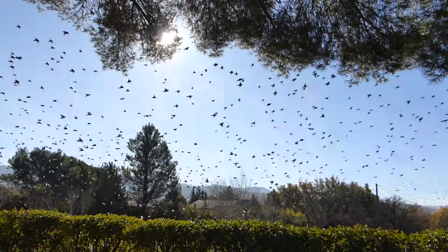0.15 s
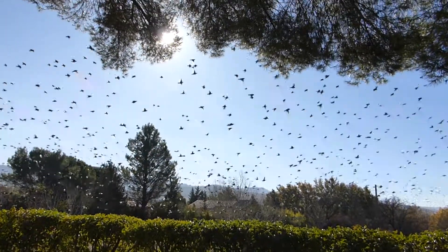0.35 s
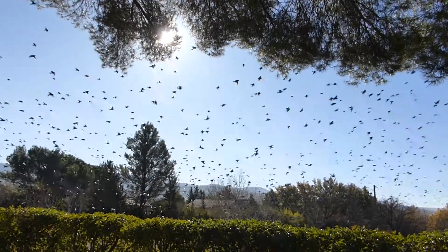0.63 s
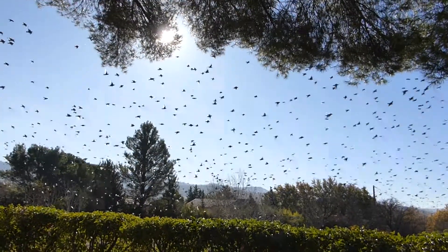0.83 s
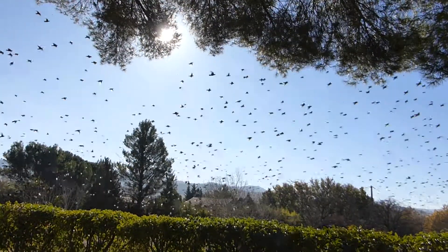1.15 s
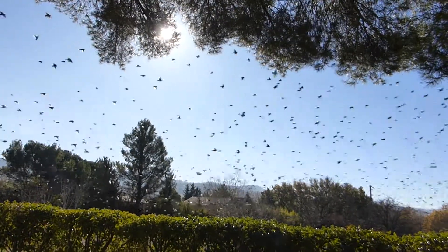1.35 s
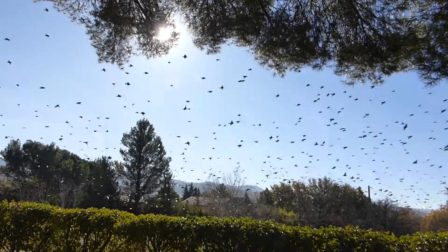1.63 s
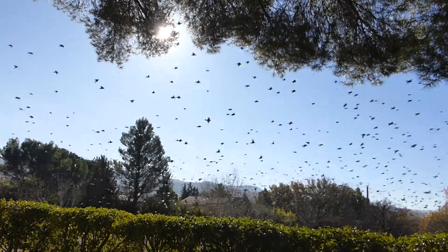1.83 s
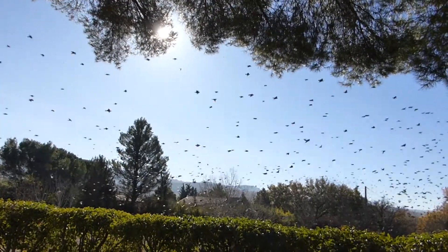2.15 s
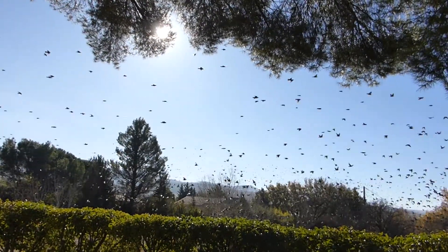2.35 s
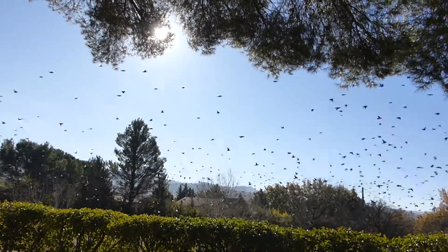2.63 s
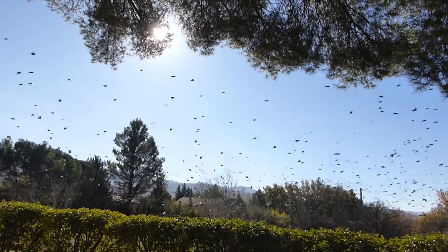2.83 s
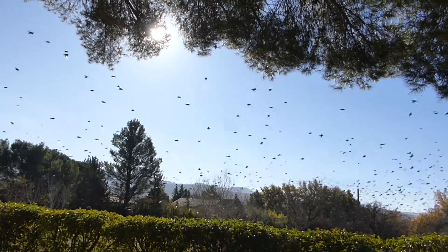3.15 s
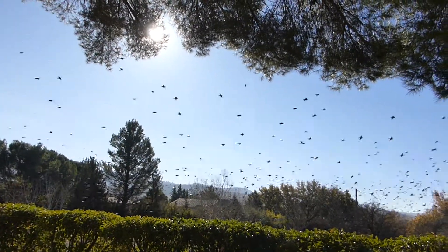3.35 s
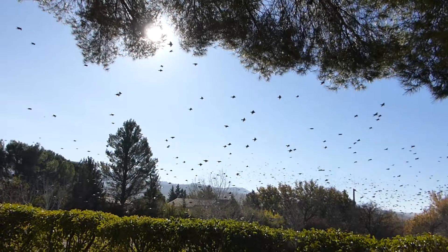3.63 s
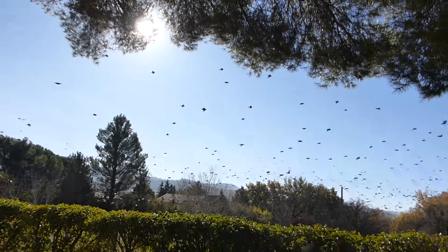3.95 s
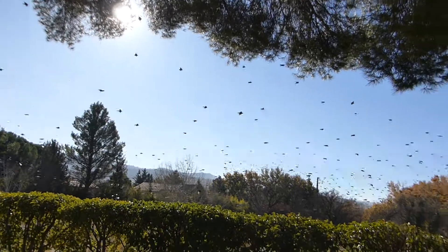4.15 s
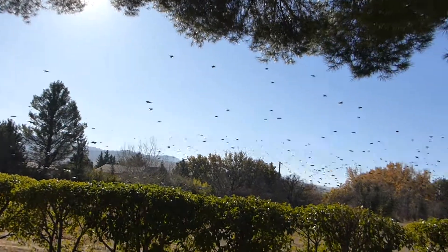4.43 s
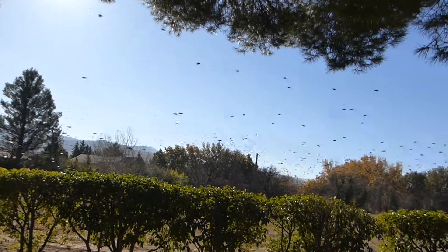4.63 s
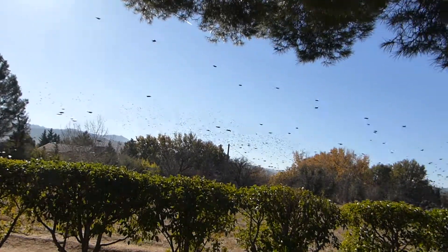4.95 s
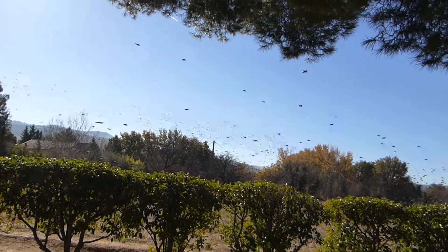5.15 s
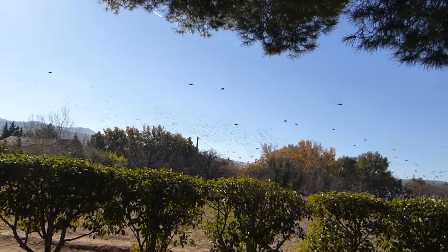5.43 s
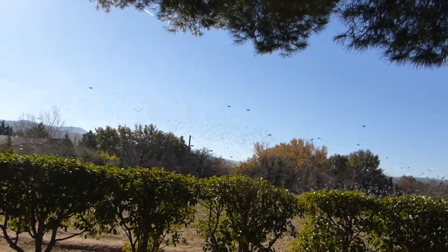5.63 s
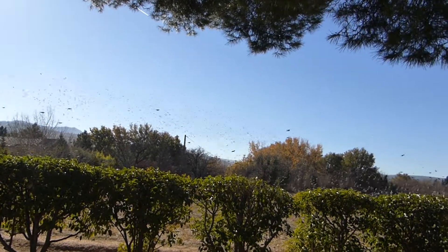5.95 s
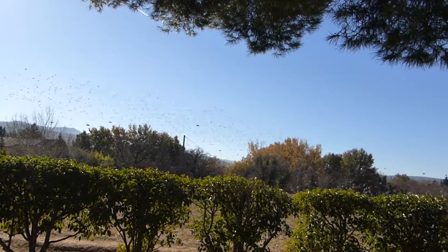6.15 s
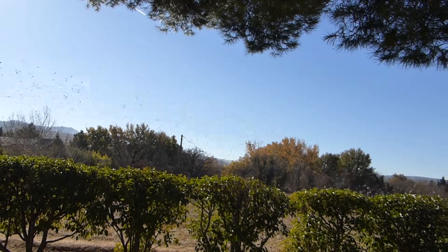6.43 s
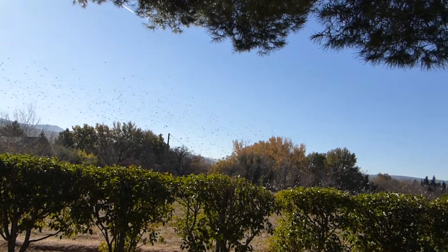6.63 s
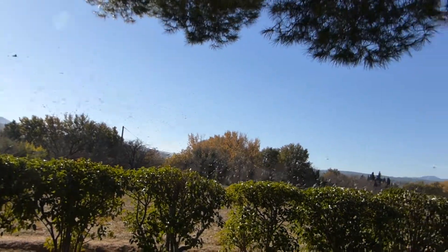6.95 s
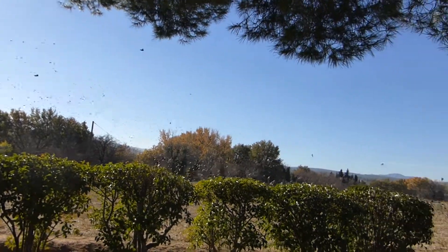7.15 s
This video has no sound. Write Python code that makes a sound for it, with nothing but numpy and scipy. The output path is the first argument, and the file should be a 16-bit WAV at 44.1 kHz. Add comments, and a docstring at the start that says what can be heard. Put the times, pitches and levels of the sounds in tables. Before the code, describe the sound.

Continuous dense twittering of countless starlings outdoors, blurred by distance and scattered tree echoes. Close birds add quick gliding whistles, rapid chirping rattles and tiny ticks, spread slightly left and right. Around four seconds rattles cluster and the crowd thickens; later a long thin whistle falls, and two soft wing puffs pass close just before the end. Quiet wing rush and distant valley wash sit underneath in a small stereo microphone.

```python
"""Starling flock over a garden

Near birds whistle, rattle and click: trembling sines, trains of chirps and decaying ticks.
Behind them, thousands of small calls make the babble of far birds, with echoes from trees and ground.
Shaped noise makes the rush of wings, close wing puffs, low hum and far wash.
A small microphone pair colours it all.
"""
import sys
import numpy as np
from scipy import signal
from scipy.fft import rfft, irfft, next_fast_len
from scipy.io import wavfile
from scipy.ndimage import uniform_filter1d

SR = 44100
rng = np.random.default_rng(int(sys.argv[2]) if len(sys.argv) > 2 else 0)


def int16_out(signal):
    """Quantize to a 16-bit WAV file."""
    q = np.round(np.clip(np.atleast_2d(signal).T, -1, 1) * 32767)
    wavfile.write(sys.argv[1], SR, q.astype(np.int16))


N = 321930


def gain_of(db):
    """Amplitude factor of a level in dB."""
    return 10 ** (np.asarray(db) / 20)


def evened(x):
    """Scales x to rms 1."""
    return x / np.sqrt(np.mean(x ** 2) + 1e-20)


def faded(x, fade_s):
    """Soft start and end."""
    return x * signal.windows.tukey(len(x), min(2 * fade_s * SR / len(x), 1))


def read(points, hz):
    """Reads a curve of (Hz, value) points, linear over log frequency."""
    point_hz, value = np.transpose(points)
    return np.interp(np.log(hz + 1), np.log(point_hz + 1), value)


def coloured(x, gain):
    """Multiplies the spectrum by gain(hz)."""
    size = next_fast_len(N)
    spectrum = rfft(x, size) * gain(np.fft.rfftfreq(size, 1 / SR))
    return irfft(spectrum, size)[..., :N]


def add(mix, start_s, sound, pan_db):
    """Adds a mono sound in place; pan_db is left minus right."""
    part = mix[:, max(round(start_s * SR), 0):][:, :len(sound)]
    part += gain_of([[pan_db / 2], [-pan_db / 2]]) * sound[:part.shape[1]]


def drift(length, span):
    """Smooth random curve of rms about 1 that changes over span samples."""
    smooth = uniform_filter1d(rng.standard_normal(length + 200), span)
    return evened(uniform_filter1d(smooth, span))[:length]


ROUND_TOP = 1.08  # exponent; above 1 the level lingers near its peak


def shape(length_s, first_hz, last_hz, bend_hz, peak_db, place, rise_db, fall_db):
    """Pitch glides from first to last with a bend; level swells to the peak and fades."""
    u = np.linspace(0, 1, int(length_s * SR))
    hz = first_hz + (last_hz - first_hz) * u + bend_hz * (1 - (2 * u - 1) ** 2)
    slope_db = np.where(u < place, rise_db, fall_db)
    return hz, gain_of(peak_db - slope_db * abs(u - place) ** ROUND_TOP)


def whistle(hz, waver, flutter_db, octave_db):
    """A near sine whose pitch and level tremble."""
    wavering_hz = hz * (1 + waver * drift(len(hz), span=60))
    turns = np.cumsum(wavering_hz) / SR
    tone = np.sin(2 * np.pi * turns) + gain_of(octave_db) * np.sin(4 * np.pi * turns)
    flutter = gain_of(flutter_db * drift(len(hz), span=150))
    return faded(evened(tone * flutter), 0.0018)


# One long falling whistle. Each row: time in seconds, pitch in Hz, level in dB.
LONG_CALL = [(6.124, 2880, -32), (6.135, 7500, -38), (6.147, 8090, -40), (6.2, 7880, -38.5),
             (6.3, 7720, -44.5), (6.42, 7080, -40), (6.44, 6530, -35), (6.47, 5330, -42)]
# Whistles of near birds. Each row: start in seconds, length in seconds, first pitch in Hz,
# last pitch in Hz, bend at mid-call in Hz, peak level in dB, place of the peak (0-1).
WHISTLE_CALLS = [ (0.0, 0.083, 3570, 3710, -80, -41, 0.64), (0.019, 0.033, 2100, 2068, 1, -37, 0.07),
                 (0.021, 0.026, 1036, 1040, 2, -41, 0.4), (0.152, 0.035, 2355, 2300, 0, -39.5, .4),
                 (0.227, 0.08, 4360, 4950, 60, -42.5, 0.2), (0.34, 0.05, 3700, 3880, 510, -31, 0.75),
                 (0.412, 0.07, 1790, 1660, 0, -42.5, 0.34), (0.498, 0.059, 3780, 3930, 660, -33, 0.87),
                 (.51, 0.048, 6050, 6300, 550, -43, .55), (0.507, 0.079, 3130, 2900, -58.5, -36, 0),
                 (0.605, 0.048, 2230, 2136, -2, -39, 0.2), (0.678, 0.11, 1832, 1677, -110, -44, 0.6),
                 (0.9, 0.13, 2570, 2440, 60, -45.5, 0.9), (1.069, 0.062, 3460, 4220, -18, -41, 0.75),
                 (1.48, 0.056, 3310, 3650, 682, -41, .7), (1.832, 0.16, 3160, 3030, -26.5, -41.5, 0.4),
                 (2.095, 0.027, 3090, 3800, -200, -37, .7), (2.103, 0.027, 1840, 2480, 50, -38.5, .6),
                 (2.114, 0.065, 4450, 5650, 480, -40, 0.3), (2.128, .014, 3050, 3350, 30, -37, .6),
                 (2.575, 0.08, 7460, 6400, 300, -42.5, 0.4), (2.805, 0.076, 2950, 3400, 0, -41, .4),
                 (2.808, .035, 6300, 6200, 12, -45.5, 0.7), (2.66, 0.018, 3620, 5160, 0, -35, 0.5),
                 (2.725, .035, 5520, 3800, 13, -43, 0.4), (2.882, 0.022, 2760, 3170, 0, -31, 0.93),
                 (2.908, 0.031, 7250, 6500, 350, -44.5, .7), (2.942, .04, 6800, 6550, 450, -47, .5),
                 (2.982, 0.049, 6700, 6500, 330, -45, .4), (3.005, 0.032, 3500, 4800, -300, -36.5, 0.9),
                 (3.258, 0.063, 3850, 3920, -50, -40, 0.2), (3.518, .02, 3790, 4450, 6, -32, 1),
                 (3.524, 0.027, 5450, 6270, 248, -38, 0.03), (3.75, 0.044, 2550, 2750, 0, -30.5, 0.2),
                 (3.784, 0.024, 2180, 2670, 0, -33.5, 0.5), (3.841, 0.031, 8050, 8130, 0, -40.5, 0.7),
                 (4.162, 0.03, 5900, 6100, 795, -46, 0.2), (4.199, 0.038, 5900, 4800, 57, -36.5, 0.6),
                 (4.455, 0.15, 6340, 5500, 558, -45.5, 0.5), (4.613, 0.029, 2540, 2860, 0, -38, .05),
                 (4.685, 0.105, 7600, 6000, 550, -43, 0.5), (4.713, 0.025, 2496, 3180, -120, -30.5, 0.55),
                 (5.036, 0.054, 2010, 1960, -6, -41, 0.6), (5.316, 0.074, 1650, 1305, -120, -44, 0.43),
                 (5.428, 0.1, 3270, 3010, -54, -29.5, 0.9), (5.429, 0.075, 8500, 7950, 100, -43, 0.3),
                 (5.697, 0.077, 1640, 1340, -16, -46, 0.6), (5.753, 0.0264, 5730, 6150, 55, -37.5, .6),
                 (5.818, 0.0088, 2370, 2100, 1, -35, .3), (6.075, 0.053, 7970, 8100, 0, -42, 0.8),
                 (6.488, 0.095, 5720, 4670, -45, -38, .05), (6.24, 0.042, 4230, 4440, -23, -34, .65),
                 (6.288, 0.088, 2116, 2180, 150, -40.5, 0.55), (6.55, 0.085, 1724, 1810, 46, -40.5, 0.6),
                 (6.6, 0.16, 7530, 7450, 200, -47, 0.8), (6.682, 0.039, 4180, 3644, 3, -32, 0.5),
                 (6.785, 0.022, 4650, 7800, 900, -31, 0.1), (6.79, 0.051, 2790, 3020, -4, -33, 0.3),
                 (7.03, 0.037, 3940, 3660, 0, -37, .05), (7.128, 0.047, 4500, 4336, 3, -33.5, 0.5)]
WHISTLE_RISE_DB, WHISTLE_FALL_DB = 12, 13.5  # level change over one call length around the peak
STEADY_WAVER = .008  # rms pitch tremble, share of pitch


def along(rows):
    """Start time in seconds and the other columns, sample by sample."""
    s, *columns = np.transpose(rows)
    t = np.arange(s[0], s[-1], 1 / SR)
    return [s[0]] + [np.interp(t, s, column) for column in columns]


def near_whistles():
    """Trembling near sines that glide and swell, each at a random pan."""
    mix = np.zeros((2, N))
    start_s, hz, db = along(LONG_CALL)
    rounded_hz = uniform_filter1d(hz, 100, mode="nearest")
    calls = [(start_s, rounded_hz, gain_of(db))]
    for start_s, *row in WHISTLE_CALLS:
        calls.append((start_s, *shape(*row, WHISTLE_RISE_DB, WHISTLE_FALL_DB)))
    for start_s, hz, gain in calls:
        call = gain * whistle(hz, STEADY_WAVER, flutter_db=2.2, octave_db=-45)
        add(mix, start_s, call, 0.99 * rng.standard_normal())
    return mix


def rattle(hz, rate_hz, blur, sweep, octave_db, dip, uneven_db):
    """A train of upward chirps, whole, broken or cut short; blur scatters timing and pitch and fills gaps."""
    blur = np.clip(blur, 0, 1)
    uneven_rate_hz = rate_hz * (1 + (.02 + .55 * blur) * drift(len(hz), span=200))
    beats = np.cumsum(uneven_rate_hz) / SR
    place = beats % 1  # position within the chirp
    luck = rng.standard_normal((80, 3))[beats.astype(int) % 80]  # one draw per chirp
    jitter = (0.067 + 0.329 * blur) * drift(len(hz), span=24)
    scatter = sweep * (0.0609 * luck[:, 0] + jitter)
    rise = sweep * (.05 - np.exp(-place / .33))  # quick rise, then a plateau
    turns = np.cumsum(hz * (1 + rise + scatter)) / SR
    broken = 1 - np.minimum(dip + 0.18 * luck[:, 2], 1) * np.sin(np.pi * place) ** 6
    pulse = np.sin(np.pi * place ** 1.29) ** 0.62 * broken
    gate = (pulse + 0.27 * blur) * gain_of(uneven_db * luck[:, 1])
    overtones = np.sin(4 * np.pi * turns) + 0.15 * np.sin(6 * np.pi * turns)
    tone = np.sin(2 * np.pi * turns) + gain_of(octave_db) * overtones
    return faded(evened(gate * tone), 0.0029)


# Rattles of near birds. Each row: start in seconds, length in seconds, first pitch in Hz,
# last pitch in Hz, peak level in dB, place of the peak (0-1), mean pulses per second, blur (0-1),
# chirp sweep as a share of pitch, octave relative to the fundamental in dB,
# dip in mid-chirp (1 breaks it in two, under 0 makes a short peak).
RATTLE_CALLS = [ (0.716, 0.11, 5650, 5350, -27, 0.47, 92.6, 0.13, 0.4, -17.5, 0.4),
                (0.804, 0.079, 4500, 3010, -31, 0.27, 92.6, 0.25, 0.43, -6, 0),
                (1.261, 0.064, 4940, 4000, -40.5, 0.25, 77, 0.35, 0.25, -21, .8),
                (1.39, 0.26, 2460, 2530, -38.5, 0.32, 38, 0.7, 0.05, -35, 0),
                (1.66, 0.2, 2640, 2370, -44, 0.35, 38.2, .6, 0.11, -35, -0.5),
                (1.91, 0.12, 4900, 3990, -39, 0.42, 83.8, .6, 0.37, -15, 0),
                (2.374, .155, 5300, 4610, -37, 0.36, 85.5, 0.25, 0.3, -18, 0),
                (2.515, 0.125, 2450, 2480, -39, 0.45, 96, 0.24, 0.07, -43, .8),
                (2.648, 0.078, 5620, 5500, -37, 0.26, 83.7, 0.26, 0.3, -13.5, 0.5),
                (2.77, 0.11, 2590, 2560, -37.5, 0.32, 89.3, 0.31, 0.2, -35, .8),
                (3.692, 0.061, 4210, 4970, -29.5, 0, 69.6, 0.06, 0.25, -15, -9),
                (3.68, 0.1, 5420, 4320, -32.5, 0.45, 89.2, 0.43, 0.37, -13.5, 0),
                (3.867, 0.037, 5500, 5360, -32.5, 0.59, 84, 0.25, 0.26, -20, 0.5),
                (3.901, 0.057, 4940, 4800, -28, 0.15, 79.4, 0.1, 0.31, -21, -1.5),
                (3.95, 0.17, 5060, 4540, -35.5, 0.12, 74.2, 0.32, 0.28, -30, .6),
                (4.286, 0.068, 6250, 6560, -37.5, 0.26, 67, .02, 0.17, -30, -11),
                (4.337, 0.095, 5750, 4870, -27, 0.02, 78, 0.11, 0.39, -20.5, .9),
                (4.405, 0.11, 5270, 3670, -27.5, 0.43, 80.7, 0.31, 0.32, -15.5, 0.5),
                (4.682, 0.23, 5900, 4620, -35, 0.31, 83.3, 0.51, 0.29, -18, 2),
                (4.885, 0.05, 5300, 4750, -36, 0.41, 90, .3, 0.24, -23, -0.5),
                (5.125, .04, 4000, 3950, -34, 0.6, 86.8, 0.4, 0.15, -12, -1),
                (5.577, 0.05, 5680, 4920, -29, 0.56, 84.7, .1, 0.23, -8.5, 2),
                (5.608, 0.16, 4410, 4140, -29, 0, 98.3, 0.16, 0.2, -7.5, .8),
                (5.845, 0.11, 5600, 5300, -38.5, 0.061, 75.5, 0.23, 0.28, -32, -2),
                (5.984, 0.11, 6070, 4870, -35.5, 0.59, 83, 0.31, 0.3, -34, -2),
                (6.14, 0.068, 3020, 3180, -39, 0.54, 95.2, 0.45, 0.48, -20, -2),
                (6.457, 0.079, 6000, 5400, -34, 0.46, 72, 0.21, 0.31, -20, 0.5),
                (6.639, 0.1, 5470, 3690, -32.5, 0.62, 80, 0.23, 0.26, -10, 1),
                (6.845, 0.064, 3130, 3110, -34, 0.5, 89.6, 0.39, .25, -25, 2)]
RATTLE_RISE_DB, RATTLE_FALL_DB = 21, 16  # level change over one call length around the peak
RATTLE_HOLD = .15  # lingers near first pitch: bend as a share of the whole glide


def near_rattles():
    """Chirp trains that glide and swell, each at a random pan."""
    mix = np.zeros((2, N))
    for start_s, length_s, first_hz, last_hz, peak_db, place, *voice in RATTLE_CALLS:
        bend_hz = RATTLE_HOLD * (first_hz - last_hz)
        hz, gain = shape(length_s, first_hz, last_hz, bend_hz, peak_db, place,
                         RATTLE_RISE_DB, RATTLE_FALL_DB)
        call = gain * rattle(hz, *voice, uneven_db=1.0)
        add(mix, start_s, call, 1.9 * rng.standard_normal())
    return mix


# Bill clicks. Each row: time in seconds, tick level in dB, low knock relative to the tick in dB.
BILL_CLICKS = [(0.0226, -22, -6), (0.2427, -25, 1), (0.76, -21, -8), (1.2205, -26, -16), (2.861, -22, -10),
               (4.1213, -37, 4.5), (4.5892, -24, -6), (6.3879, -19, -1.5), (6.863, -22.5, -5)]


def clicks():
    """Decaying 8 kHz tick plus dull 1.1 kHz knock; small ticks fall at random."""
    mix, t = np.zeros((2, N)), np.arange(200) / SR
    tick = np.exp(-t / 0.00023) * np.cos(2 * np.pi * 8000 * t)
    knock = np.exp(-t / 0.00083) * np.sin(2 * np.pi * 1100 * t)
    for start_s, db, knock_db in BILL_CLICKS:
        click = gain_of(db) * (tick + gain_of(knock_db) * knock)
        add(mix, start_s, click, 1.8 * rng.standard_normal())
    draw, size = rng.random(N), rng.exponential(1, N)
    small = (draw < 150 / SR) * gain_of(-46.0 + 1.37 * np.minimum(size, 4))  # about 150 per second
    return mix + signal.oaconvolve(small, tick)[:N]


# Close wing strokes. Each row: start in seconds, relative level in dB, length in seconds.
WING_PUFFS = [(6.885, -50, 0.073), (6.993, -44, 0.104)]


def puffs():
    """Soft bursts of dull air noise around 800 Hz."""
    mix = np.zeros((2, N))
    for start_s, db, length_s in WING_PUFFS:
        air = faded(rng.standard_normal(int(length_s * SR)), 0.01)
        add(mix, start_s, gain_of(db) * air, -2.5)
    return coloured(mix, lambda f: 4.9 * np.exp(-np.log((f + 1) / 800) ** 2 / 0.4))


# The crowd over time. Each row: time in seconds, babble of far birds before brightening in dB,
# rush of wings in its level band in dB, low hum in its level band in dB.
CROWD_LEVELS = [(0, -40.5, -52, -55), (1, -42.5, -53, -58), (2, -43, -53, -56), (3, -40.5, -53.5, -59.5),
                (4, -38.5, -55.5, -61.5), (4.6, -36, -54, -60.5), (5.3, -36.5, -56.5, -60),
                (5.8, -34, -55, -56), (6.3, -34.5, -56, -56), (6.8, -31.5, -55.5, -57),
                (7.3, -37.5, -53.5, -59)]


def flock(column):
    """Gain curve of one crowd layer."""
    rows = np.array(CROWD_LEVELS)
    return gain_of(np.interp(np.arange(N) / SR, rows[:, 0], rows[:, column]))


# Colour of the far calls. Each row: frequency in Hz, gain in dB.
BABBLE_COLOUR = [(1000, -10), (1500, -14), (2500, -3.5), (3300, -3.5), (4500, -2), (6000, -5), (7000, -11),
                 (12000, -22)]
FAR_BLUR = .3
NEAREST_FAR = .5  # closest far bird, as a share of the crowd's depth


def far_birds(count=260, channels=19):
    """A stock of short calls, each uttered many times at random moments, distances and sides."""
    mix = np.zeros((2, N))
    for pitch, glide, arch, length, kind in rng.random((count, 5)):
        u = np.linspace(0, 1, int(SR * (.012 + .06 * length ** 2)))
        contour = 1 + .5 * (glide - .6) * u + .6 * (arch - .4) * u * (1 - u)
        hz = 1500 * 5.0 ** pitch * contour
        if kind < .45:
            call = whistle(hz, 0.012, flutter_db=3.0, octave_db=-26.0)
        else:
            call = rattle(hz, 60 + 60 * arch, FAR_BLUR, 0.3, octave_db=-19,
                          dip=.9 - 2.9 * glide ** 2, uneven_db=-1.0)
        for when, far, side in rng.random((channels, 3)):
            distance = NEAREST_FAR + np.sqrt(far)  # most are far, a few close
            add(mix, when * N / SR, call / distance, 7 * (side - .5))
    return coloured(mix, lambda f: gain_of(read(BABBLE_COLOUR, f)))


def trees(x, t60_s):
    """Sparse decaying echoes of random sign from trees and ground."""
    size = SR // 2
    taps = np.zeros((2, size))
    at = np.arange(200, size - 20, 20) + rng.integers(0, 20, (2, (size - 201) // 20))
    np.put_along_axis(taps, at, rng.choice([-1., 1.], at.shape), 1)
    taps[1] = 0.56 * taps[0] + 0.63 * taps[1]  # partly shared by both sides
    taps *= gain_of(-60 * np.arange(size) / SR / t60_s)
    taps /= np.linalg.norm(taps, axis=1)[:, None]
    return signal.fftconvolve(x, taps, axes=1)[:, :N]


FAR_ECHO_DB = -5


def far_babble():
    """Far calls with echoes; treble above about 5 kHz grows with the crowd level."""
    far = far_birds()
    level = flock(column=1)
    babble = evened(far + gain_of(FAR_ECHO_DB) * trees(far, 1.0)) * level
    shrill = coloured(babble, lambda f: f ** 4 / (f ** 4 + 5000.0 ** 4))
    return babble + 0.26 * shrill * level / level.max()


# Likeness of the two sides. Each row: frequency in Hz, left-right correlation (limited to 1).
SIDE_LIKENESS = [(60, 0.91), (150, 0.92), (380, 0.86), (950, 0.62), (2380, 0.88), (5980, 0.8),
                 (15000, 0.61)]


def rush(spectrum, patchy_db, flicker_db, level_hz):
    """Noise of random short-time spectra with patches and flicker; mono sum has rms 1 inside level_hz."""
    frames, hz = N // 128 + 5, np.fft.rfftfreq(512, 1 / SR)
    a, b, c, d, patches = np.ascontiguousarray(rng.standard_normal((frames, 257, 5)).T)
    patches = evened(uniform_filter1d(uniform_filter1d(patches, 8, 0), 16, 1))
    same = np.clip(read(SIDE_LIKENESS, hz), -1, 1)[:, None]
    left = a + 1j * b
    right = same * left + np.sqrt(1 - same ** 2) * (c + 1j * d)
    z = np.array([left, right])
    z *= gain_of(patchy_db * patches + flicker_db * drift(frames, span=6))
    noise = signal.istft(z, nperseg=512, noverlap=384)[1][:, :N]
    x = coloured(noise, lambda f: gain_of(read(spectrum, f)))
    band = coloured(x.mean(0), lambda f: (f > level_hz[0]) & (f < level_hz[1]))
    return x / np.sqrt(np.mean(band ** 2))


# Spectrum of the wings. Each row: frequency in Hz, relative density in dB per Hz.
WING_SPECTRUM = [(300, -29), (700, 11), (1300, 12), (3000, 15), (6000, 2), (8300, 8.5), (10000, 3.5),
                 (14000, -3), (15600, -8.5)]


def wings():
    """Rush of wings: wing beats as a hiss with random flicker."""
    return rush(WING_SPECTRUM, 0.65, 1.52, (9500, 15000)) * flock(column=2)


# Spectrum of the hum. Each row: frequency in Hz, relative density in dB per Hz.
HUM_SPECTRUM = [(30, -19.5), (60, -8), (102, -0.5), (170, 1), (260, -4), (450, -33)]


def hum():
    """Low hum of the countryside: noise centred near 100-260 Hz."""
    return rush(HUM_SPECTRUM, 1.0, 0.48, (60, 250)) * flock(column=3)


# Spectrum of the far wash. Each row: frequency in Hz, relative density in dB per Hz.
WASH_SPECTRUM = [(120, -12), (250, -3), (480, 1), (900, -5), (2000, -29)]
WASH_DB = -51  # level of 60-2000 Hz


def wash():
    """Far wash of the valley: noise of constant mean level."""
    return rush(WASH_SPECTRUM, 0.73, 0.79, (60, 2000)) * gain_of(WASH_DB)


def scene():
    """Near birds with echoes, then the crowd, wings and background."""
    near = near_whistles() + near_rattles() + clicks()
    near_echo = gain_of(-7.0) * trees(near, 0.24)
    return near + near_echo + puffs() + far_babble() + wings() + hum() + wash()


# Balance of the microphone ports. Each row: frequency in Hz, left minus right in dB.
PORT_BALANCE = [(60, 2), (240, -1.5), (950, 0.5), (3770, 1.5), (15000, 1.0)]
NOTCH_HZ, NOTCH_WIDTH_HZ, NOTCH_DB = 9030, 233, -13  # narrow dip near 9 kHz; half-width
BASS_CUT_HZ, EDGE_HZ = 74, 15540


def record(dry):
    """Port balance, bass roll-off, a narrow notch, then the band limit."""
    side = np.array([[.5], [-.5]])

    def microphone(f):
        notch_db = NOTCH_DB / (1 + ((f - NOTCH_HZ) / NOTCH_WIDTH_HZ) ** 2)
        bass_cut = f ** 2 / (f ** 2 + BASS_CUT_HZ ** 2)
        return gain_of(side * read(PORT_BALANCE, f) + notch_db) * bass_cut

    heard = coloured(dry, microphone)
    lowpass = signal.firwin(1023, EDGE_HZ, window=("kaiser", 9), fs=SR)
    return signal.oaconvolve(heard, lowpass[None], "same")


dry = scene()
out = record(dry)
int16_out(out)
```